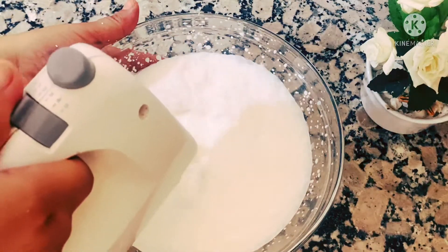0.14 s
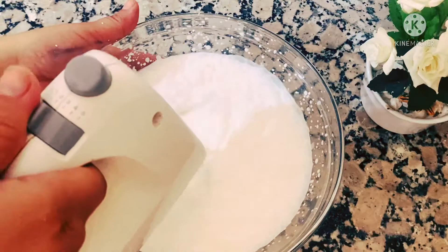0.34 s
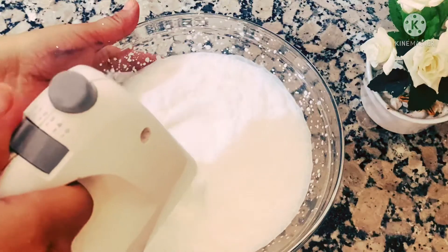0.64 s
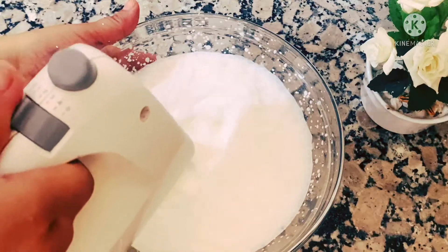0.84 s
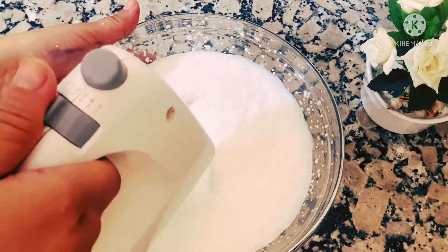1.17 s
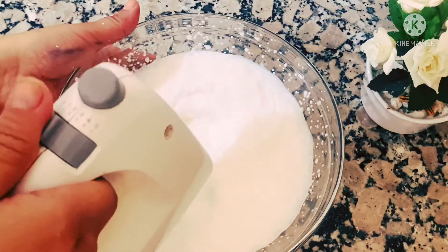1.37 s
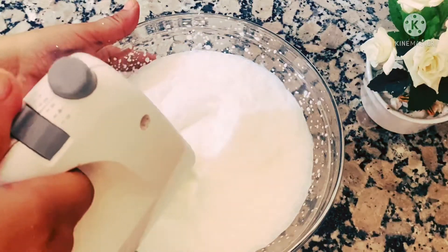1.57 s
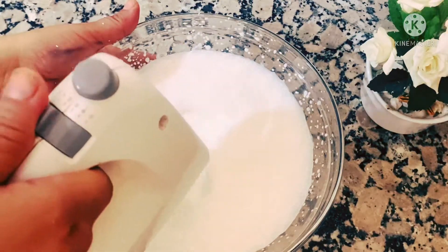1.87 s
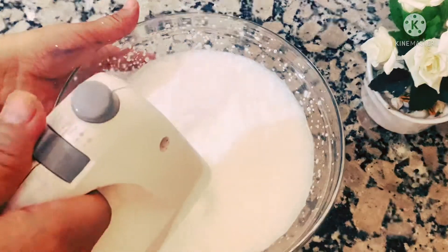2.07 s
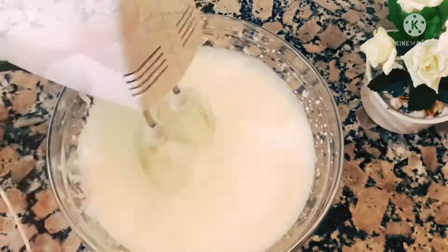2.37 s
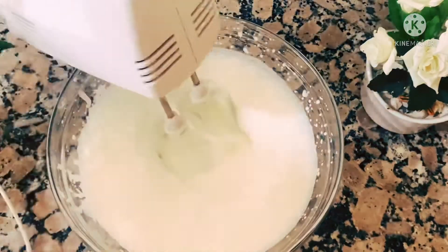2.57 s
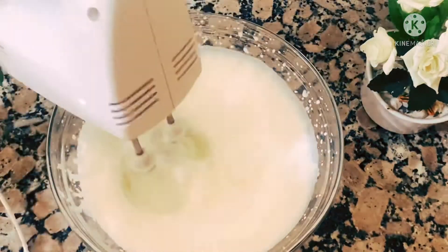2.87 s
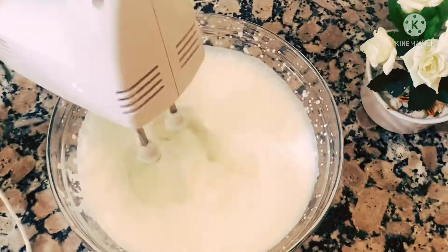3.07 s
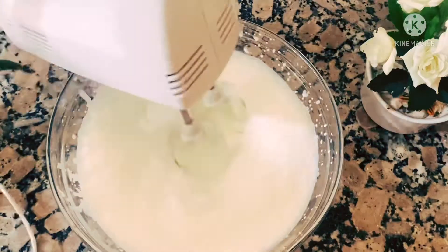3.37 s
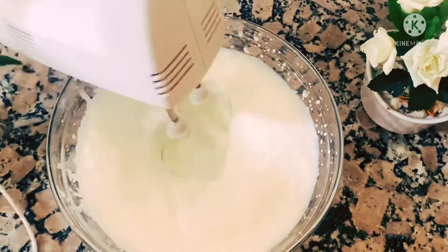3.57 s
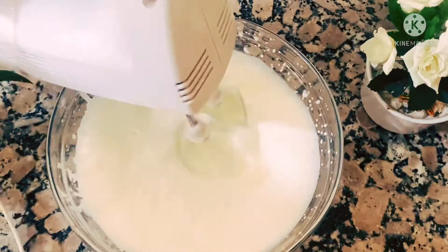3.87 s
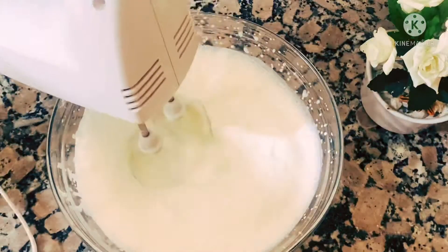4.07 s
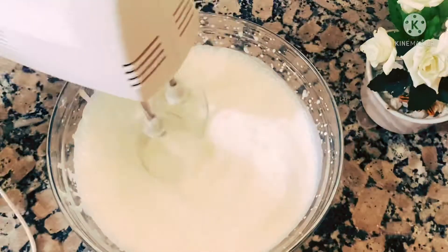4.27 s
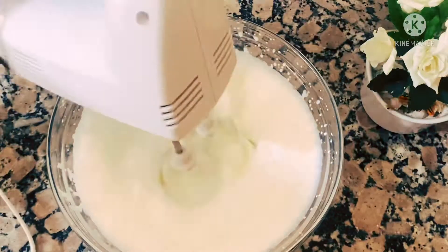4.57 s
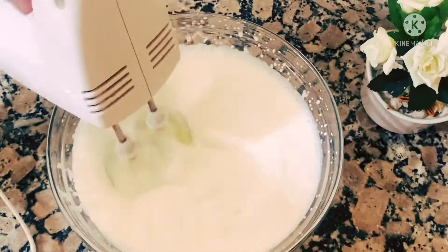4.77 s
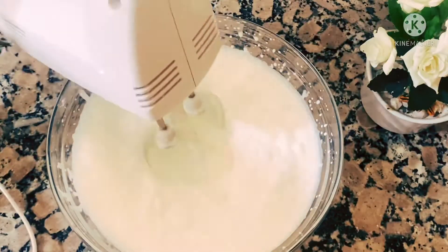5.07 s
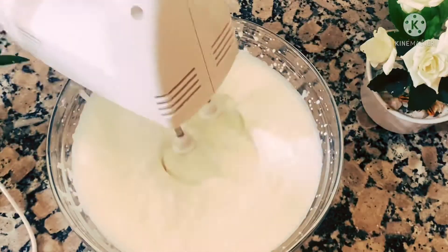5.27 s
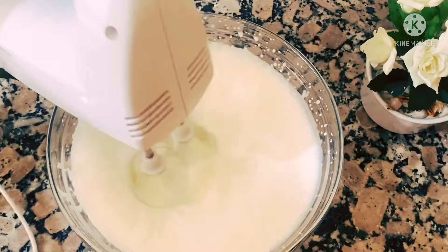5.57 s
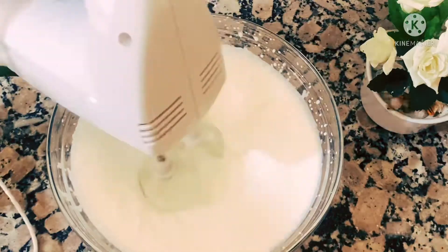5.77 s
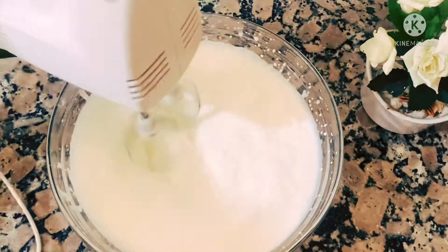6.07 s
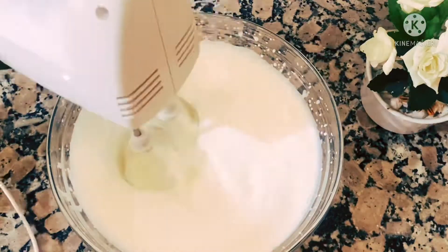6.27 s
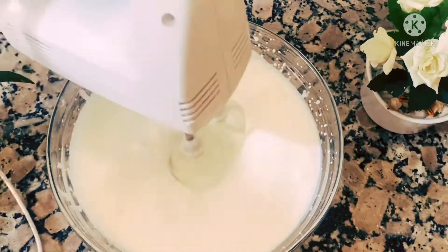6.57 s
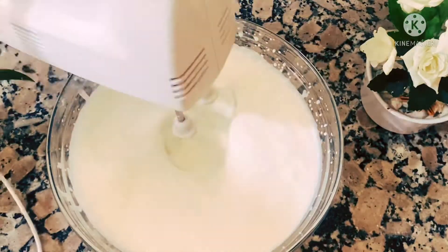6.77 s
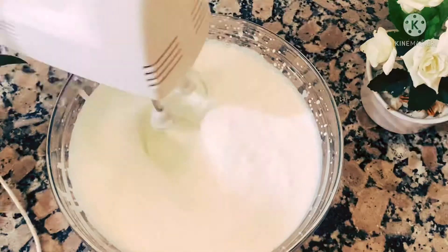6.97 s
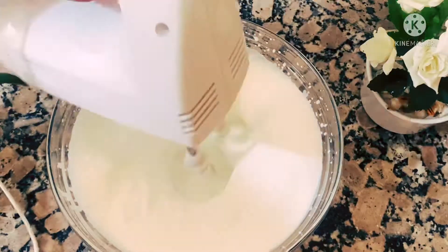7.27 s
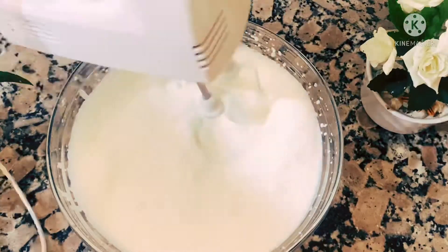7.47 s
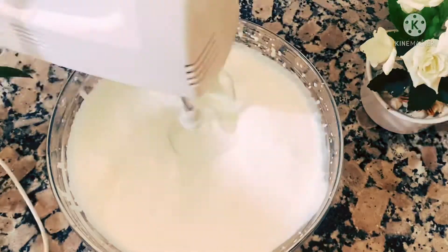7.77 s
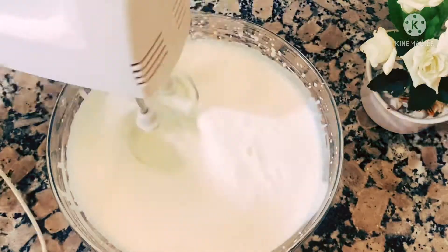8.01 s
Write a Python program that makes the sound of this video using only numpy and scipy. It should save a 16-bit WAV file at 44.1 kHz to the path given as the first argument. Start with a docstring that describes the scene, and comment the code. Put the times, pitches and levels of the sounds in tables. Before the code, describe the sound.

An electric hand mixer is already running close by, whipping cream in a glass bowl on a stone worktop. For the first two seconds it works at a low setting: a strong, slightly wavering motor whine over growling gears and a low hum, with fizzing spray, small wet pops and short rasps as the beaters graze the glass. Between about 2.1 and 2.6 seconds this blends into a higher, lighter and quieter whir with an airy fan hiss and a soft swish of cream. The beaters tick on the bowl once near 2.7 seconds, in small clusters around 4.4 and 4.8, then more often from 5.8 on. From about 5.7 seconds a rapid, uneven gear chatter grows stronger, and soft low gulps come from the cream. The mixer is still running at the end, around 8 seconds.

```python
"""Hand mixer whipping cream

An electric mixer works close by, in a glass bowl on a stone worktop. At a low setting its gears growl
and its blades graze the bowl; this fades into a higher, lighter setting. The motor whines on multiples
of its shaft speed, its fan hisses, the cream churns and the beaters tick on the glass."""
import sys
import numpy as np
from scipy import signal
from scipy.fft import rfft, irfft, next_fast_len
from scipy.io import wavfile
from scipy.ndimage import uniform_filter1d

SR = 44100
rng = np.random.default_rng(int(sys.argv[2]) if len(sys.argv) > 2 else 0)


def pcm_store(signal):
    """Save signal as 16-bit PCM."""
    levels = np.round(np.clip(np.atleast_2d(signal), -1, 1) * 32767)
    wavfile.write(sys.argv[1], SR, levels.astype(np.int16).T)


N = 358974
T = np.arange(N) / SR
FFT_SIZE = next_fast_len(N + 4096, True)
BINS_HZ = np.maximum(np.fft.rfftfreq(FFT_SIZE, 1 / SR), 1)
GEAR_RATIO = 21.33   # motor turns for one turn of the beaters
COMMUTATOR_BARS, ARMATURE_SLOTS, FAN_BLADES = 24, 12, 8   # contacts, coil slots and blades on the shaft


def from_db(db):
    """Turn decibels into a gain to multiply by."""
    return 10 ** (np.asarray(db) / 20)


def unit_power(x):
    """Scale a signal to an average power of one."""
    return x / np.sqrt(np.mean(x ** 2) + 1e-20)


def in_time(rows):
    """Join the points of a curve, giving a value at every sample."""
    return np.interp(T, *np.transpose(rows))


def in_frequency(rows, column=1):
    """Join the dB points of a spectrum, giving a gain at every frequency."""
    columns = np.transpose(rows)
    return from_db(np.interp(np.log(BINS_HZ), np.log(columns[0]), columns[column]))


def colour(x, gain):
    """Filter a sound with one gain for each frequency."""
    return irfft(rfft(x, FFT_SIZE) * gain, FFT_SIZE)[:N]


def drift(rate_hz):
    """A smooth random wobble, typically of size one."""
    step = 40   # samples between points
    r = np.exp(-2 * np.pi * rate_hz * step / SR)
    slow = signal.lfilter([1], [1, -2 * r, r * r], rng.standard_normal(N // step + 2002))[2000:]
    return np.interp(np.arange(N) / step, np.arange(len(slow)), unit_power(slow))


def uneven_noise(depth_db, rate_hz):
    """Noise whose level flickers at random."""
    return rng.standard_normal(N) * from_db(depth_db * drift(rate_hz))


def resonate(x, hz, width):
    """Pass a sound twice through one resonance, leaving a narrow band at a power of one."""
    r = np.exp(-np.pi * width / SR)
    section = [1 - r, 0, r - 1, 1, -2 * r * np.cos(2 * np.pi * hz / SR), r * r]
    return unit_power(signal.sosfilt([section, section], x))


def ringing_noise(modes):
    """Each resonance is kept ringing by its own noise."""
    return sum(from_db(db) * resonate(rng.standard_normal(N), hz, width) for hz, width, db in modes)


def steady(x, seconds, steadiness=.85):
    """Even out the gusts of a ringing noise over the given time."""
    power = uniform_filter1d(x ** 2, int(seconds * SR)) / np.mean(x ** 2)
    return x / np.maximum(power, 1e-6) ** (steadiness / 2)


def clicks(times, heights):
    """One single-sample click at each time."""
    out = np.zeros(N)
    out[(times * SR).astype(int)] = heights
    return out + 1e-18


def die_away(x, seconds):
    """Give each click a fading tail."""
    return signal.lfilter([1], [1, -np.exp(-1 / (seconds * SR))], x)


def cut_bass(x, hz, order):
    """Turn down everything below hz; a higher order cuts more steeply."""
    return signal.sosfilt(signal.butter(order, hz, "high", fs=SR, output="sos"), x)


def blade_beat(angle, depth_db, count=4):
    """A pulsing gain: the load peaks count times in each turn of the beaters."""
    return unit_power(from_db(depth_db * np.cos(count * angle / GEAR_RATIO)))


# Where the sound sits in stereo: f/Hz, left over right/dB, stereo width/dB
STEREO_LOW = [(100, -4, -12), (280, 0.5, -9), (500, -0.5, -4.5), (680, -5, -12), (800, 3.5, -2.5),
              (1340, -0.5, -13), (1780, -0.5, -56), (2660, 0, -41), (2980, 1, -7.5), (4500, 0.3, -11),
              (5600, 0, -45), (7600, -0.5, -54), (8130, 1, 6), (10500, 0, -9), (13700, 1, 7)]
STEREO_HIGH = [(199.92, -1, -16), (420, -2.5, -23), (784, -2, -10), (1050, 3.5, -12.5), (1340, 1, -21),
               (1850, -3.5, -3), (2640, -6, -13.5), (3130, 3, -2.5), (4310, -0.5, -9.5), (4900, 0, -24),
               (5340, 0, -55), (11000, 0, -61), (13300, 0, -22.5)]
def place(x, stereo):
    """Set balance and stereo width at each frequency: some bands spread wide, others stay central."""
    balance, width = in_frequency(stereo), in_frequency(stereo, column=2)
    smear = rfft(rng.standard_normal(N) * np.exp(-T / .04), FFT_SIZE)   # makes left and right unlike
    lean = (balance - 1) / (balance + 1)
    side = colour(x, lean + width * smear / np.abs(smear))
    return np.array([x + side, x - side])


# Echoes from bowl wall and worktop: delay/s, relative gain
ECHOES_LOW = [(.000955, -.09), (.001225, -.13), (.001545, .06), (.00362, -.05)]
ECHOES_HIGH = [(.001035, -.11), (.001675, .07), (.00264, .05), (.003155, .07)]
def close_echoes(x, echoes, strength):
    """Hard surfaces close by make the sound slightly hollow."""
    ripple = sum(gain * np.exp(-2j * np.pi * BINS_HZ * delay) for delay, gain in echoes)
    return colour(x, 1 + strength * ripple)


# Deep resonances of the mixer: f/Hz, width/Hz, level/dB
DRONE_MODES = [(54.2, 12, -63.5), (105, 17, -52.5), (166.4, 34, -54)]
def drone():
    """The shaking mixer gives a low hum."""
    return ringing_noise(DRONE_MODES)


# Colour of the hiss, with a narrow gap near 13 kHz at the low setting: f/Hz, level/dB per Hz
HISS_LOW = [(30, -97), (55, -90), (100, -68.5), (220, -67), (400, -64), (900, -60), (1500, -63.5),
            (3200, -66.5), (7750, -67.5), (8200, -75.5), (10500, -72), (12200, -75), (13000, -90),
            (15700, -77.5)]
HISS_HIGH = [(30, -121.2), (90, -115.0), (180, -96.5), (400, -76.5), (850, -77.5), (1800, -77), (3700, -77),
             (4500, -78.5), (5200, -78.5), (5520, -83), (5880, -77.5), (6050, -75), (9600, -75.5),
             (12000, -75), (15700, -77.5)]
def hiss(spectrum, spit_db):
    """An airy hiss that spits slightly, coloured by the given spectrum."""
    air = unit_power(uneven_noise(spit_db, rate_hz=180))
    return colour(air * np.sqrt(SR / 2), in_frequency(spectrum))


def swish():
    """The wet cream churns with a hollow, uneven swish."""
    return from_db(-46.3) * resonate(uneven_noise(depth_db=2, rate_hz=45), hz=4520, width=1140)


# How loud the spray is: t/s, level/dB
SPRAY_LEVEL = [(0.02, -39), (0.12, -37), (0.3, -44), (0.58, -40), (0.66, -35.5), (0.88, -34), (1.05, -40),
               (1.17, -45), (1.42, -44), (1.55, -38), (1.77, -37), (1.87, -43), (2.1, -41)]
# Colour of the spray: f/Hz, relative level/dB
SPRAY_SPECTRUM = [(1500, -30), (4000, -7), (6500, -2), (7700, 0), (9500, -1.5), (12200, -2), (13200, -15)]
def spray(angle):
    """Each of the four blades flings up fine, fizzing cream."""
    fizz = uneven_noise(depth_db=1.5, rate_hz=90) * blade_beat(angle, depth_db=1.5)
    return from_db(in_time(SPRAY_LEVEL)) * unit_power(colour(fizz, in_frequency(SPRAY_SPECTRUM)))


# Air pockets in the cream: t/s, half length/s, f/Hz, width/Hz, level/dB
AIR_POCKETS = [(.07, 0.043, 175, 50, -47), (0.403, .01, 1190, 120, -33), (.458, .01, 1140, 120, -32),
               (.638, .012, 1120, 120, -28), (0.655, 0.024, 270, 110, -35),
               (0.739, 0.012, 1080, 120, -24.5), (.968, .011, 1040, 120, -33),
               (0.997, 0.052, 175, 40, -44.5), (1.343, 0.011, 1114, 120, -31),
               (1.543, .011, 1190, 140, -32), (1.62, .01, 1110, 160, -29), (2.008, .018, 1100, 140, -31),
               (2.087, 0.011, 1090, 200, -28.5), (2.088, .01, 875, 90, -30.5), (2.085, .02, 380, 220, -36),
               (4.364, .06, 254.3, 90.5, -58), (4.46, 0.055, 270, 90, -56), (6.33, 0.11, 210, 120, -64),
               (6.47, 0.039, 263, 70, -46), (6.54, 0.06, 296, 25, -52), (6.907, 0.034, 256, 35, -45),
               (7.0, .06, 252, 35, -51), (7.206, 0.035, 255, 35, -56), (7.37, 0.079, 258, 50, -56.5),
               (7.837, .045, 259, 30, -53)]
def gulps():
    """Each air pocket torn open by the beaters swells and rings briefly."""
    out = np.zeros(N)
    for s, half_length, hz, width, db in AIR_POCKETS:
        swell = np.exp(-((T - s) / half_length) ** 2)
        pocket = steady(resonate(rng.standard_normal(N), hz, width), seconds=2 / width) * swell
        out += from_db(db) * pocket * np.sqrt(np.sum(swell ** 2) / np.sum(pocket ** 2))
    return out


# A blade grazes the glass: t/s, relative level/dB
GRAZE_TIMES = [(0.066, -24), (0.140, -24.5), (0.200, -28), (0.214, -25.5), (0.275, -29), (0.527, -28),
               (0.659, -26), (0.681, -25.5), (0.769, -30), (0.806, -23.5), (0.848, -27), (0.877, -23.5),
               (0.951, -26), (1.010, -26), (1.474, -28), (1.509, -28), (1.544, -27), (1.617, -26),
               (1.687, -26), (1.762, -25.5), (1.834, -26)]
# Colour of a graze: f/Hz, relative level/dB
GRAZE_SPECTRUM = [(600, -28), (2000, -3), (4000, 0), (7600, 0.5), (9000, -6.5), (12000, -2), (13500, -14)]
def grazes(half_length_s=.0031, trim_db=-1.2):
    """A wire sweeping past the glass gives a short, bright rasp."""
    power = sum(from_db(db) ** 2 * np.exp(-((T - s) / half_length_s) ** 2) for s, db in GRAZE_TIMES)
    rasp = unit_power(colour(rng.standard_normal(N), in_frequency(GRAZE_SPECTRUM)))
    return from_db(trim_db) * np.sqrt(power) * rasp


# Notes of the beater wire and the cream-damped bowl: f/Hz, time to fade by 60 dB/s, relative level/dB
WIRE_NOTES = [(2390, 0.018, -2.5), (2625, 0.023, -3.5), (2900, 0.022, -11), (7300, .004, -7)]
GLASS_NOTES = [(520, 0.035, -16), (880, .018, -15), (1310, .022, -12), (1640, .012, -16), (1860, .022, -16),
               (1935, 0.11, -16.5), (3398, .016, -13), (4200, .016, -17), (4950, 0.012, -15)]
def strike(times, peak_db, notes, spread_db=1.5):
    """Each touch sets every note ringing as a fading sine, with a slightly random strength."""
    chance_db = spread_db * rng.standard_normal((len(times), len(notes)))
    out = np.zeros(N)
    for k, (hz, fade_s, db) in enumerate(notes):
        hits = clicks(times, from_db(peak_db + db + chance_db[:, k]))
        r, w = from_db(-60 / (fade_s * SR)), 2 * np.pi * hz / SR   # decay and angle per sample
        out += (-1) ** k * signal.lfilter([0, np.sin(w)], [1, -2 * r * np.cos(w), r * r], hits)
    return out


# A beater touches the bowl (levels are relative): t/s, wire level/dB, glass level/dB, crack level/dB
TOUCHES = [(2.68, -27, -25, -28), (4.3554, -22, -30, -38), (4.4105, -24, -18, -27),
           (4.4154, -24, -18.5, -29), (4.4463, -24, -27, -38), (4.7964, -27, -24, -33),
           (4.8074, -19.5, -16.5, -20.5), (4.8121, -25, -20, -26), (4.8504, -29, -26, -30),
           (5.8391, -20.5, -23, -34), (6.0242, -17.5, -21.5, -32), (6.0651, -20, -30, -38),
           (6.4512, -20.5, -18.5, -27), (6.4549, -18, -23, -29), (6.494, -20.5, -30, -38),
           (6.7864, -21, -28, -35), (7.228, -22, -24, -36), (7.2504, -21.5, -28, -36),
           (7.337, -26, -21, -34), (7.3492, -17.5, -21, -29), (7.6914, -23, -26, -36),
           (7.735, -27, -23, -28), (8.045, -24, -22, -34)]
def ticks(trim_db=-2.5):
    """Steel meets glass with a bright crack and both ring, giving off almost no bass."""
    times, wire_db, glass_db, crack_db = np.transpose(TOUCHES)
    ringing = strike(times, wire_db, WIRE_NOTES) + strike(times, glass_db, GLASS_NOTES)
    crack = die_away(clicks(times, from_db(crack_db)), seconds=.0016) * rng.standard_normal(N)
    crack = cut_bass(crack, hz=1500, order=1)
    return from_db(trim_db) * cut_bass(ringing + crack, hz=370, order=4)


def jolt(boost_db=15.5):
    """A gain for the gear rattle: it jumps at each touch on the bowl, then settles."""
    times, wire_db, *_ = np.transpose(TOUCHES)
    kicks = clicks(times, from_db(wire_db + boost_db) ** 2)
    return np.sqrt(1 + die_away(kicks, seconds=.022))


# How loud the knock is as the beaters dig deeper: t/s, level/dB
KNOCK_LEVEL = [(2.6, -55), (3.2, -49.5), (5.5, -49), (5.71, -54), (5.75, -37), (5.83, -39.5), (5.93, -41.5),
               (6.0, -35.5), (6.09, -39), (6.14, -47), (6.2, -36), (6.29, -42), (6.42, -40), (6.57, -43),
               (6.72, -42), (6.82, -38.5), (7.05, -42.5), (7.14, -42), (7.36, -38), (7.4, -50), (7.46, -40),
               (7.56, -43), (7.78, -40), (7.84, -44), (8.04, -39.5), (8.1, -44)]
# Resonances of the gearbox: f/Hz, width/Hz, relative level/dB
GEARBOX_MODES = [(2241, 57, -6.5), (2330, 96, -1)]
def knock(angle, chatter=.64):
    """Three times per beater turn the gears take up their slack and knock, chattering in between."""
    turns = angle / (2 * np.pi) + .2 * drift(6)   # loose gears knock early or late
    count = np.floor(3 * turns / GEAR_RATIO)
    blows = unit_power(np.diff(count, prepend=count[0]) * from_db(2.5 * drift(20)))
    ringing = sum(from_db(db) * resonate(blows + chatter * rng.standard_normal(N), hz, width)
                  for hz, width, db in GEARBOX_MODES)
    return from_db(in_time(KNOCK_LEVEL)) * ringing


# Resonances of the gear case: f/Hz, width/Hz, level/dB
CASE_MODES = [(556, 15, -44), (590.2, 27, -35), (634.7, 34, -34), (686.6, 16, -44), (712.4, 20, -42.5)]
# Load on the gears: t/s, level change/dB
GEAR_LOAD = [(0.03, 2), (0.18, -2), (0.45, 0), (0.6, 2), (0.8, -2.5), (0.88, 0), (1.12, -1.7), (1.4, -3),
             (1.51, 2.5), (1.6, -2.5), (1.72, 0.5), (1.86, -6.5), (1.96, 2), (2.13, -5.5), (2.21, 0),
             (2.33, -2.5), (2.42, 1.5)]
def growl(angle):
    """The straining gears keep their case ringing, louder as the load grows."""
    case = steady(ringing_noise(CASE_MODES), seconds=.083)
    return case * from_db(in_time(GEAR_LOAD)) * blade_beat(angle, depth_db=1)


# Resonances of housing, gearbox and vent slots: f/Hz, width/Hz, level/dB
BODY_LOW = [(293.3, 42, -47), (329.2, 16, -45.5), (394.5, 26, -44.5), (481, 26, -48), (798, 51, -51),
            (1088, 120, -42), (1736, 99, -40.5), (2090, 140, -39.5), (2556, 560, -35), (4470, 320, -38.5),
            (5160, 380, -44)]
BODY_HIGH = [(409.3, 39, -60), (680.6, 19, -58), (1020, 91, -54), (1213, 194, -47), (1315, 105, -47),
             (1586, 43, -53.5), (1615, 280, -49), (1960, 67, -55.5), (2322, 210, -47.5), (2543, 206, -43),
             (2745, 170, -49), (2848, 38, -49), (2933, 100, -50.5), (3143, 110, -49), (3425, 180, -52),
             (7490, 780, -45.5), (10670, 550, -44.5), (13040, 450, -50)]
def rattle(modes, housing_gain, gear_gain, gears_above_hz=1800):
    """Uneven contacts of the gear teeth shake the housing (low notes) and the gearbox (high notes)."""
    contacts = from_db(1.5 * drift(130))
    out = np.zeros(N)
    for hz, width, db in modes:
        gain = gear_gain if hz > gears_above_hz else housing_gain
        out += from_db(db) * resonate(rng.standard_normal(N) * contacts * gain, hz, width)
    return out


def tone(angle, multiple, waver_db, rough):
    """A sine at a multiple of the shaft speed, its level wavering and slightly rough."""
    sine = np.sin(multiple * angle + rng.uniform(0, 2 * np.pi))
    return unit_power(sine * from_db(waver_db * drift(4.8)) * (1 + rough * drift(24)))


# Motor tones: multiple of shaft speed, level/dB, change per extra turn a second/dB,
# change at full drag/dB, waver/dB
MOTOR_LOW = [(1, -52.5, -1.5, 0, -1), (4, -55, -6.5, 1, 2), (25, -52, -4, 0, 1), (32, -50, 0, 1, 1.5)]
MOTOR_HIGH = [(3, -45.1, -.45, .7, 1.1), (36, -49.4, .5, .3, 3.2)]
def motor_tones(angle, motion, table, rough):
    """Tones grow or fade as speed slides them into or out of a resonance, and as the cream drags."""
    extra_speed, drag, _ = motion
    return sum(from_db(db + speed_db * extra_speed + drag_db * drag)
               * tone(angle, multiple, waver_db, rough)
               for multiple, db, speed_db, drag_db, waver_db in table)


# How loud each spinning part whines, before its trim: t/s, level/dB
COMMUTATOR_LOW = [(0.02, -32.5), (0.35, -36.5), (0.53, -28.5), (0.77, -35), (0.95, -33.5), (1.23, -37.5),
                  (1.42, -28), (1.6, -36), (2.1, -33.5)]
COMMUTATOR_HIGH = [(2.4, -50), (2.58, -39), (2.8, -41), (3.1, -47), (3.2, -42), (3.35, -50), (3.6, -46),
                   (3.81, -52), (3.94, -43), (4.09, -52), (4.32, -40), (4.46, -53), (4.6, -42), (4.8, -49),
                   (4.92, -42), (5.05, -49), (5.43, -48), (5.55, -45), (5.7, -47), (5.87, -37.5),
                   (6.0, -46), (6.07, -39), (6.18, -51), (6.3, -39), (6.42, -50), (6.68, -44),
                   (6.95, -39.5), (7.03, -48), (7.18, -38), (7.29, -45), (7.41, -40), (7.52, -47),
                   (7.72, -42), (7.89, -48), (8.1, -42)]
ARMATURE_LEVEL = [(0.02, -42), (0.5, -34.5), (0.68, -40.5), (1.03, -36), (1.25, -39.5), (1.52, -44),
                  (1.67, -38.5), (1.95, -39.5), (2.3, -42)]
SHRILL_LEVEL = [(0.08, -34), (0.26, -47), (0.63, -36), (0.9, -47), (1.11, -35), (1.39, -42), (1.48, -37),
                (1.87, -49), (2.02, -40.5), (2.15, -46), (2.3, -36)]
FAN_LEVEL = [(0.02, -39), (0.17, -37.5), (0.28, -41), (0.45, -35), (0.78, -32), (1.0, -35.5), (1.11, -31),
             (1.21, -36), (1.42, -32), (1.65, -34), (1.85, -42), (2.12, -34.5), (2.4, -37)]
FAN_OCTAVE_LEVEL = [(0.02, -44), (0.15, -39.5), (0.6, -38.5), (0.77, -33), (0.92, -38), (1.03, -37),
                    (1.15, -41), (1.36, -45), (1.65, -36), (1.81, -42), (1.9, -37), (2.07, -43),
                    (2.36, -35.5)]
def whine(angle, multiple, level, waver_db, rough, trim_db=0):
    """A ring of bars, slots or blades sings as it spins past the parts that stand still."""
    return from_db(in_time(level) + trim_db) * tone(angle, multiple, waver_db, rough)


# Speed of the motor shaft: t/s, turning rate/Hz
SHAFT_LOW = [(0.02, 289.9), (0.58, 292.1), (0.91, 291.3), (1.18, 292.6), (1.51, 293.2), (1.79, 290.7),
             (1.97, 290.9), (2.25, 292.3), (2.45, 291.5)]
SHAFT_HIGH = [(2.42, 376.8), (2.61, 376.4), (3.12, 374.4), (3.58, 377.7), (4.42, 375.1), (4.51, 377.0),
              (4.84, 376.5), (5.02, 378.4), (5.39, 377.7), (5.86, 380.2), (6.04, 382.4), (6.69, 383.0),
              (6.93, 382.3), (7.16, 384.3), (7.44, 382.8), (7.53, 385.6), (7.81, 382.9), (8.12, 382.0)]
def shaft(speeds, flutter, drag_peak_s, surge_peak_s, stroke_s=.81, surge_turns=85.3):
    """The shaft's angle, fluttering as the cream drags, and three slow motions that sway the levels."""
    speed = in_time(speeds)
    angle = 2 * np.pi * np.cumsum(speed * (1 + flutter * drift(20))) / SR
    extra_speed = speed - np.mean(speeds, axis=0)[1]
    drag = np.cos(2 * np.pi * (T - drag_peak_s) / stroke_s)   # the hand circles the bowl
    surge = np.cos((angle - np.interp(surge_peak_s, T, angle)) / surge_turns)   # tied to the shaft
    return angle, (extra_speed, drag, surge)


def sway(motion, speed_db, drag_db=0, surge_db=0, waver_db=0):
    """A gain that follows extra speed, drag and surge, plus a little chance."""
    extra_speed, drag, surge = motion
    return from_db(speed_db * extra_speed + drag_db * drag + surge_db * surge + waver_db * drift(2.4))


def low_setting():
    """The slow, straining mixer: strong motor tones, growling gears, a drone, grazes and spray."""
    angle, motion = shaft(SHAFT_LOW, flutter=.00027, drag_peak_s=.77, surge_peak_s=.59)
    housing_gain = sway(motion, speed_db=-.2, drag_db=.8, waver_db=.8)
    gear_gain = sway(motion, speed_db=-.1, drag_db=.6, surge_db=-.1, waver_db=.3)
    tones = motor_tones(angle, motion, MOTOR_LOW, rough=.16)
    tones += whine(angle, COMMUTATOR_BARS, COMMUTATOR_LOW, waver_db=1.2, rough=.15)
    tones += whine(angle, ARMATURE_SLOTS, ARMATURE_LEVEL, waver_db=1, rough=.1, trim_db=-.3)
    tones += whine(angle, 3 * ARMATURE_SLOTS, SHRILL_LEVEL, waver_db=.7, rough=.15, trim_db=-1)
    tones += whine(angle, FAN_BLADES, FAN_LEVEL, waver_db=.2, rough=.06)
    tones += whine(angle, 2 * FAN_BLADES, FAN_OCTAVE_LEVEL, waver_db=.3, rough=.1)
    body = rattle(BODY_LOW, housing_gain * blade_beat(angle, depth_db=1.5), gear_gain) + growl(angle)
    air = hiss(HISS_LOW, spit_db=1.1) * gear_gain * blade_beat(angle, depth_db=.4)
    air = close_echoes(air, ECHOES_LOW, strength=.33)
    return drone() + air + grazes() + spray(angle) + body + tones


# How hard the beaters rattle the gears: t/s, level change/dB
RATTLE_LEVEL = [(2.62, -2.5), (3.0, -0.5), (3.65, 0.3), (4.1, 0), (4.43, -0.5), (4.68, 0), (4.98, 0.4),
                (5.7, -1), (5.8, -0.5), (5.92, -0.5), (6.03, 0.5), (6.11, -1), (6.45, 0.1), (6.57, -1.5),
                (6.79, 0), (7.08, -1), (7.3, -1), (7.48, -3), (7.68, 0), (8.1, 0)]
def high_setting(vents_from_hz=5000):
    """The faster, lighter mixer: bright fan hiss, knocking gears and a surging swish of cream."""
    angle, motion = shaft(SHAFT_HIGH, flutter=.000613, drag_peak_s=5.07, surge_peak_s=5.52)
    housing_gain = sway(motion, speed_db=-.2, drag_db=-.05)
    gear_gain = sway(motion, speed_db=.22, surge_db=.14, waver_db=.14)
    gear_gain *= jolt() * from_db(in_time(RATTLE_LEVEL) - .6)
    fan_gain = sway(motion, speed_db=.02, surge_db=.25, waver_db=.1)
    tones = motor_tones(angle, motion, MOTOR_HIGH, rough=.21)
    tones += whine(angle, COMMUTATOR_BARS, COMMUTATOR_HIGH, waver_db=.5, rough=.29, trim_db=.1)
    body = rattle([mode for mode in BODY_HIGH if mode[0] < vents_from_hz], housing_gain, gear_gain)
    vents = ringing_noise([mode for mode in BODY_HIGH if mode[0] >= vents_from_hz])   # blown by the fan
    air = (hiss(HISS_HIGH, spit_db=1) + vents) * fan_gain * blade_beat(angle, depth_db=.05, count=3)
    body += knock(angle)
    cream = sway(motion, speed_db=-.13, surge_db=1.2, waver_db=.3) * swish()
    return close_echoes(air, ECHOES_HIGH, strength=.48) + cream + body + tones


def scene():
    """The low setting fades into the high one in about half a second; the cream gulps under both."""
    fade_out = in_time([(2.1, 1), (2.3, .52), (2.46, .22), (2.63, 0)])
    fade_in = in_time([(2.15, 0), (2.45, .55), (2.6, 1)])
    whipping = high_setting() + ticks()
    return fade_out * place(low_setting(), STEREO_LOW) + fade_in * place(whipping, STEREO_HIGH) + gulps()


def record(dry):
    """The highest treble is cut off steeply."""
    return signal.sosfilt(signal.ellip(12, .1, 90, 15750, fs=SR, output="sos"), dry)


dry = scene()
out = record(dry)
pcm_store(out)
```